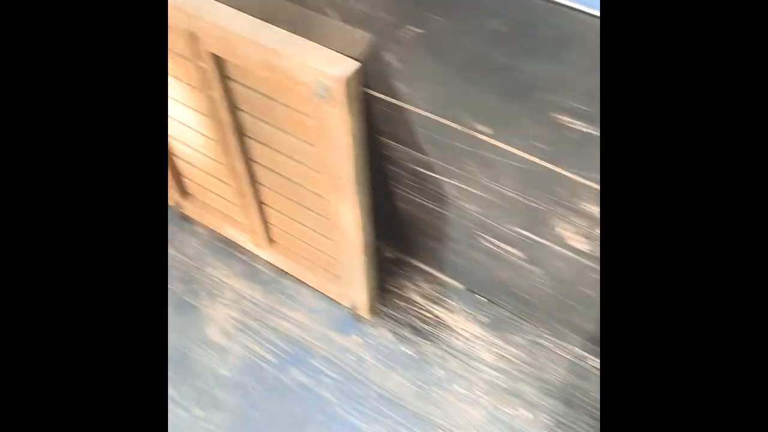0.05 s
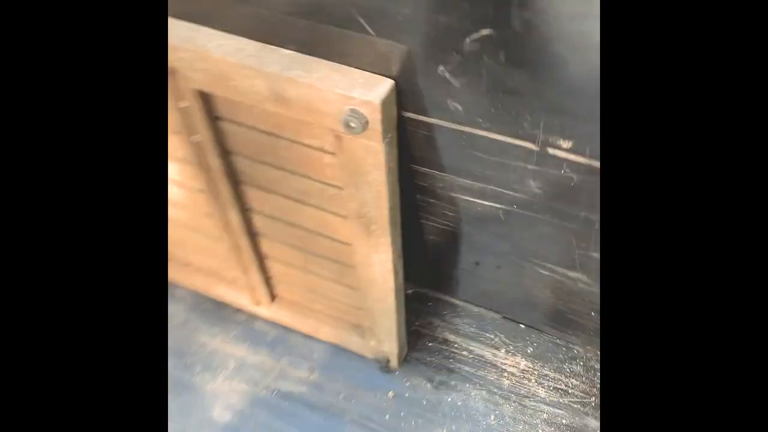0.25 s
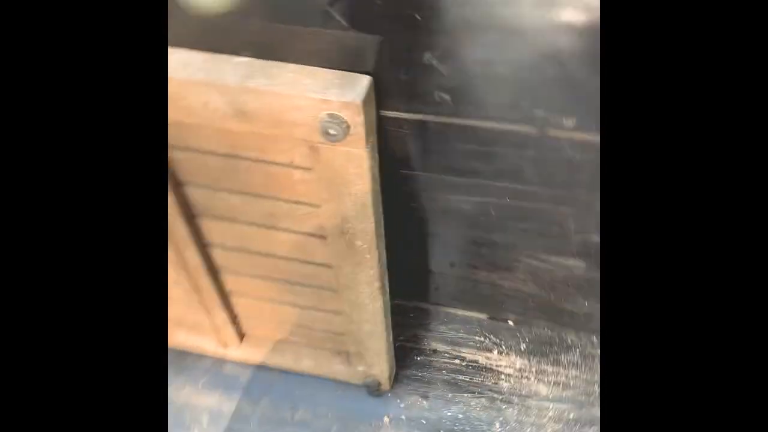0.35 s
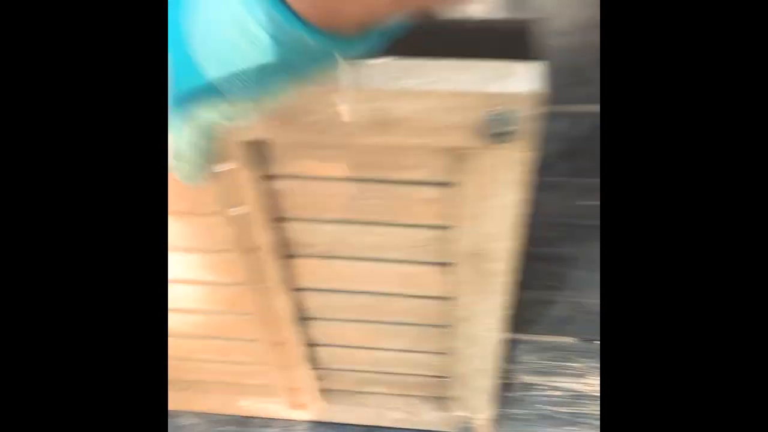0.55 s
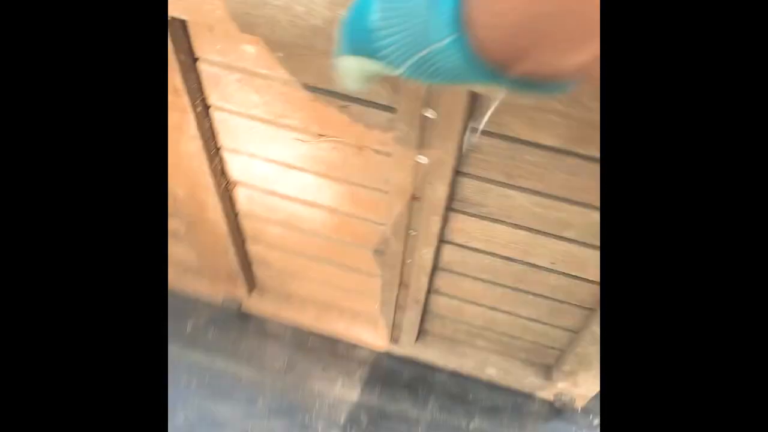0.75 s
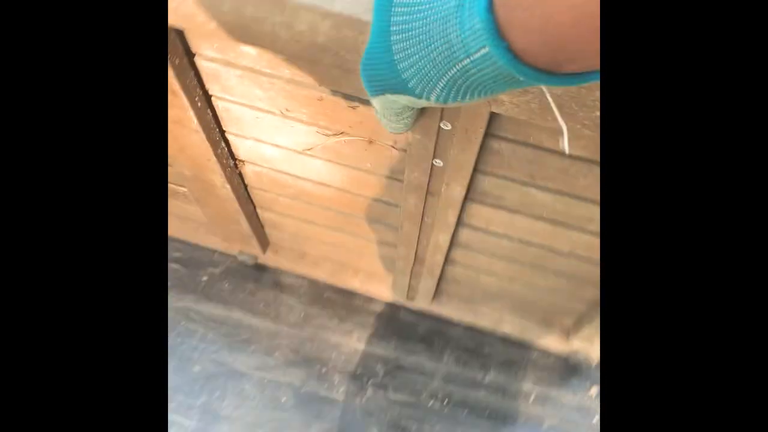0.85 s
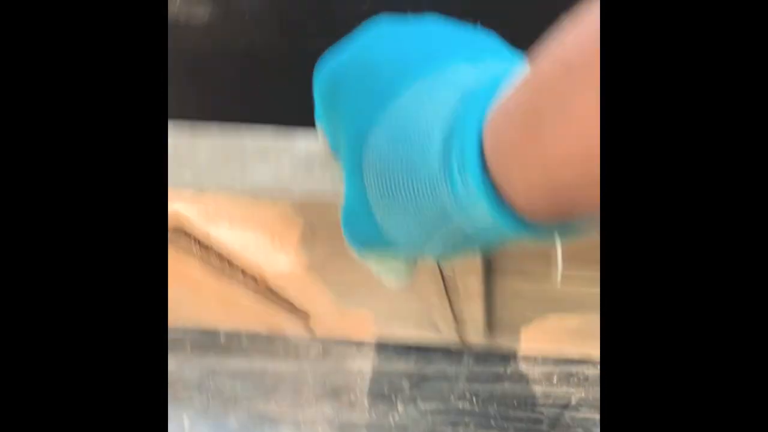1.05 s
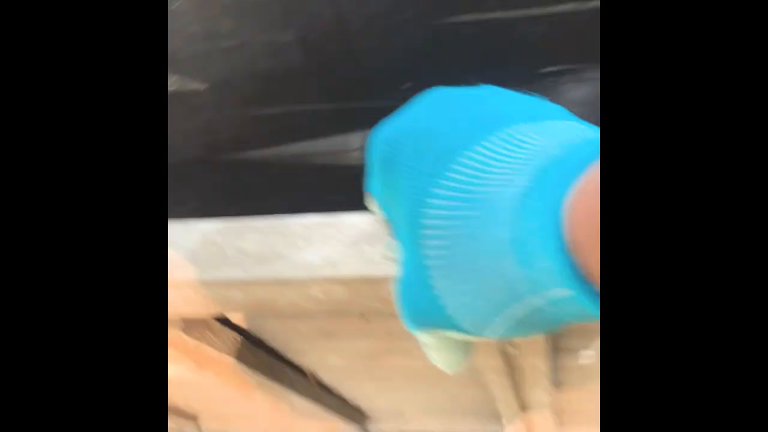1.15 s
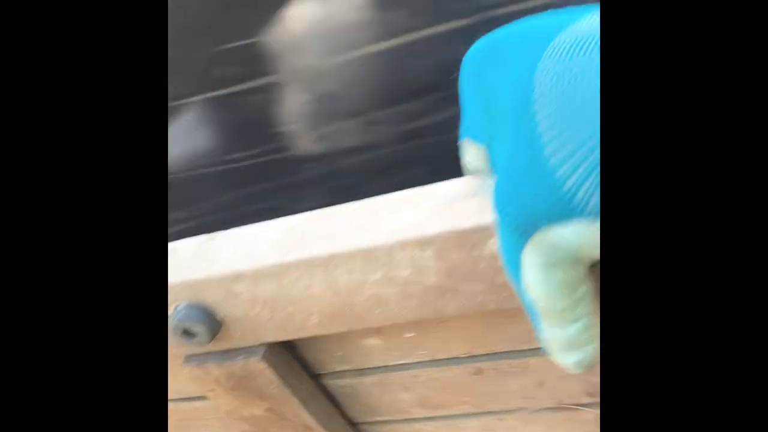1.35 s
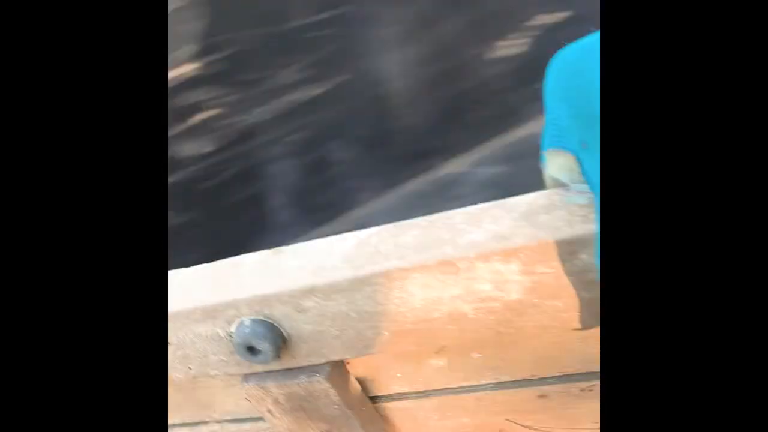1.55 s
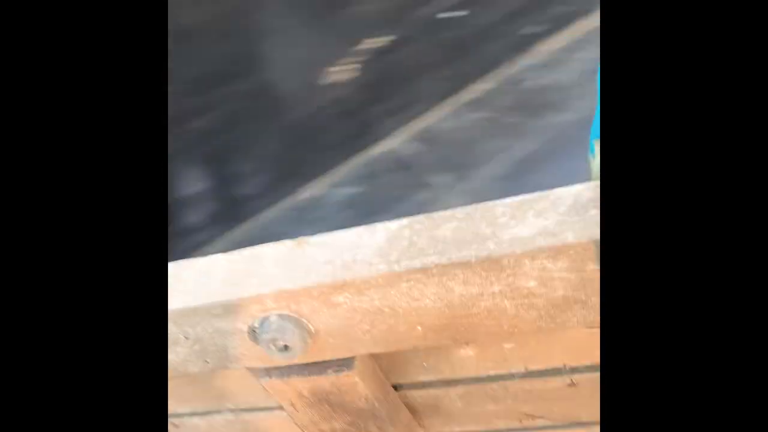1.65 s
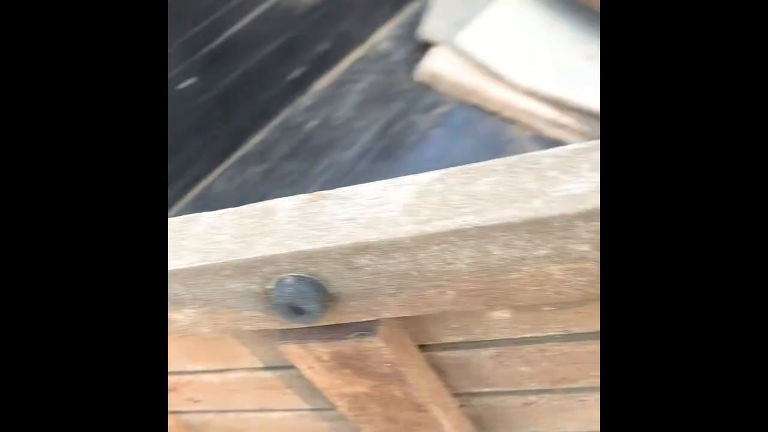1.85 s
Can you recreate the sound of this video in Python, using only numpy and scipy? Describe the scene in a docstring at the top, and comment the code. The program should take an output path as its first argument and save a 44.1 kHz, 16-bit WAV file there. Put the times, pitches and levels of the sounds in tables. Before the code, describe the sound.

A slatted wooden panel is dragged across a gritty board floor close to the microphone. It bumps and rasps, then clatters through a quick run of knocks and ends in a sharp scrape, over low outdoor rumble.

```python
"""Outdoors, on a gritty board floor close to the microphone, a gloved hand drags a slatted wooden panel.
Friction and impacts excite its modes and loose slats, so it judders, booms and knocks as it slides.
Grit hisses and rasps under the edge, which catches several times in stick-slip bursts, squeals briefly
and stops with a sharp scrape. Behind it lie a low rumble, a thin opening whistle and a faint whine."""
import sys
import numpy as np
from scipy import signal
from scipy.fft import rfft, irfft
from scipy.io import wavfile
from scipy.ndimage import map_coordinates

SR = 44100
rng = np.random.default_rng(int(sys.argv[2]) if len(sys.argv) > 2 else 0)


def dump(signal):
    """Clip the signal to [-1, 1] and save it as 16-bit WAV at the path in sys.argv[1]."""
    limited = np.clip(np.atleast_2d(signal).T, -1, 1)
    pcm = np.round(limited * 32767).astype(np.int16)
    wavfile.write(sys.argv[1], SR, pcm)


N = 83790
T = np.arange(N) / SR

# spectrum of the outdoor background (frequency [Hz], relative level [dB])
RUMBLE_SPECTRUM = [(20, -5), (55, -2), (85, 13), (125, -8.5), (300, -14.5), (600, -25.5), (2000, -36),
                   (16000, -76)]
# path of the thin whistle (time [s], frequency [Hz], level [dB])
WHISTLE_GLIDE = [(0, 7500, -77), (.07, 7200, -66), (.21, 8500, -70), (.33, 8900, -110)]

# modes of the panel and the boards under it (frequency [Hz], relative level [dB], T60 [s])
PANEL_MODES = [(66, 3, .22), (86, 1, .14), (108, -5, .16), (135, -7, .2), (164, -7, .24), (195, -10, .24),
               (235, -17, .2), (278, -13.5, .3), (345, -15.5, .28), (416, -22, .3), (575, -31, .4),
               (921, -30, .35), (1164, -32, .3)]
# dense ring of the loose slats (frequency [Hz], relative level [dB])
SLAT_SPECTRUM = [(30, -14), (70, 6), (170, 4), (330, -3.5), (450, -8.5), (560, -18), (950, -22),
                 (1500, -30.5), (8000, -66.5)]
# short woody bark at the start of a knock (frequency [Hz], relative level [dB])
BARK_SPECTRUM = [(300, 0), (850, 0.5), (4000, -38.5)]
# force with which the sliding edge shakes the panel (time [s], level [dB])
JUDDER_FORCE = [(0, -42.5), (.2, -41), (.24, -33.5), (.39, -28), (.46, -33.5), (.58, -28.5), (.88, -33),
                (.93, -20.5), (1.03, -24), (1.12, -24), (1.27, -26.5), (1.42, -34.5), (1.9, -54)]
# impacts of the panel on the floor (time [s], boom level [dB], clack level [dB])
FLOOR_IMPACTS = [(.224, 10.5, -3), (.241, 6, -8), (.291, 8.5, -11), (.397, 3, -11), (.566, 7.5, -6),
                 (.745, -1.5, -6), (.901, 7, 9), (.917, -1, 7), (.935, 13.5, 5), (.962, 7.5, 6),
                 (0.993, 7, 6.5), (1.007, 6, 8), (1.035, 8.5, 8.5), (1.086, 9, 3.5), (1.206, 1.5, 4),
                 (1.275, 2.5, -10.5), (1.51, 1.5, -22), (1.64, -2, -26), (1.685, -2.5, -20)]

# friction on the grit under the edge (time [s], hiss level [dB], rasp level [dB])
FRICTION_LEVELS = [(0, -78, -58), (.21, -67.5, -63), (.28, -50.5, -55.5), (.35, -52, -54), (.4, -64, -63),
                   (.45, -54.5, -51), (.52, -57.5, -59), (.67, -51.5, -56.5), (.76, -53.5, -49.5),
                   (.81, -57.5, -51.5), (.94, -56, -55.5), (1.02, -52, -45.5), (1.11, -54, -56),
                   (1.18, -48, -40.5), (1.27, -69, -58.5), (1.54, -74.5, -65.5), (1.63, -64.5, -56),
                   (1.85, -78, -67)]
# hiss of fine grit (frequency [Hz], relative level [dB])
HISS_SPECTRUM = [(1500, -12.5), (3000, 5.5), (4500, 6.5), (6500, 5.5), (9000, 0.5), (11500, -3.5),
                 (16000, -4.5)]
# rasp of coarse grit (frequency [Hz], relative level [dB])
RASP_SPECTRUM = [(250, -7.5), (550, 1), (1000, 7.5), (1800, 5.5), (2700, -5), (3800, 0), (6000, -27.5),
                 (14000, -31)]
FINE_GRAINS_PER_S, COARSE_GRAINS_PER_S = 9000, 900
# decay of reflections from the boards around (frequency [Hz], T60 [s])
REFLECTION_DECAY = [(1500, 0.14), (15000, 0.094)]

# the edge catches and slips (time [s], duration [s], crunch level [dB], sizzle level [dB])
EDGE_CATCHES = [(.556, 0.014, -48, -54.5), (0.752, 0.023, -42, -43.5), (0.83, 0.013, -44.5, -49),
                (.968, 0.0032, -45, -44), (1.002, 0.0066, -37.5, -45), (1.031, 0.0084, -32.5, -51),
                (1.055, 0.0094, -44, -52.5), (1.085, 0.0034, -29, -40.5), (1.138, 0.0059, -32.5, -47.5),
                (1.164, 0.0045, -37.5, -49), (1.192, 0.0093, -36.5, -38.5), (1.197, 0.0058, -34, -33.5)]
# low part of a catch (frequency [Hz], relative level [dB])
CRUNCH_SPECTRUM = [(300, 11.5), (700, 6), (1600, -0.5), (3500, -3.5), (5000, -5.5), (12000, -21)]
# high part of a catch (frequency [Hz], relative level [dB])
SIZZLE_SPECTRUM = [(2000, -8.5), (4500, 0.5), (7000, 4.5), (10000, 2.5), (12500, -4), (16000, -6)]
# squeaky resonances of the edge (frequency [Hz], width [Hz], lift [dB])
EDGE_RESONANCES = [(1450, 130, 5.5), (1871, 190, 12.5), (3100, 250, 8), (3927, 420, 11.5)]
# tones of the slipping edge (time [s], duration [s], frequency [Hz], level [dB])
EDGE_SQUEALS = [(1.084, 0.0081, 3174, -36.5), (1.169, 0.0081, 5940, -36.5), (1.19, 0.015, 1416, -32.5),
                (1.202, 0.0063, 6970, -42)]

# likeness of the two microphone ports (frequency [Hz], coherence [0-1])
PORT_COHERENCE = [(100, 1), (200, 0.98), (380, 0.75), (650, 0.17), (1800, 0.37), (4500, 0.96),
                  (15000, 0.98)]
# phase of the left port relative to the right (frequency [Hz], lead [rad])
PORT_PHASE = [(0, 0), (200, -.08), (400, -.5), (750, -2.4), (1600, -4.6), (3700, -4.4), (4600, -3.14),
              (16000, 13.9)]


def amp(db):
    """Amplitude ratio of a level in decibels."""
    return 10 ** (np.asarray(db) / 20)


def unit(x):
    """Normalisation to an rms of 1."""
    return x / np.sqrt(np.mean(x ** 2) + 1e-20)


def curve(table, column=1):
    """Linear interpolation of a time table at every sample."""
    table = np.array(table)
    return np.interp(T, table[:, 0], table[:, column])


def at_frequency(table, hz):
    """Interpolation on a log-frequency axis."""
    table_hz, value = np.transpose(table)
    return np.interp(np.log(hz + 1), np.log(table_hz + 1), value)


def add(mix, start_s, sound):
    """Superposition of a sound on the mix from a given time."""
    part = mix[..., round(start_s * SR):][..., :sound.shape[-1]]
    part += sound[..., :part.shape[-1]]


def ring(x, response):
    """Convolution of each channel with its impulse response."""
    return signal.fftconvolve(np.atleast_2d(x), np.atleast_2d(response), axes=1)[:, :N]


def colour(x, spectrum, peaks=(), size=4096):
    """Minimum-phase filtering, at unit energy, by a spectrum and its resonance peaks."""
    hz = abs(np.fft.fftfreq(size, 1 / SR))
    peak_db = sum(lift / (1 + (2 * (hz - centre) / width) ** 2) for centre, width, lift in peaks)
    log_gain = np.log(amp(at_frequency(spectrum, hz) + peak_db))
    taps = np.fft.ifft(np.exp(np.conj(signal.hilbert(log_gain)))).real[:size // 2]
    return ring(x, taps / np.linalg.norm(taps))


def fuzzy_tone(hz, width_hz):
    """Random modulation spreads a tone into a narrow band of noise."""
    knots = np.cumsum(width_hz * np.ones(N)) / SR
    carrier = np.exp(2j * np.pi * np.cumsum(hz * np.ones(N)) / SR)
    noise = rng.standard_normal((2, N)) + 1j * rng.standard_normal((2, N))
    return unit(np.array([(np.interp(knots, np.arange(N), side) * carrier).real for side in noise]))


def rumble(level_db=-40.5):
    """Stationary outdoor noise with most of its power in the bass."""
    gain = amp(at_frequency(RUMBLE_SPECTRUM, np.fft.rfftfreq(N, 1 / SR)))
    return amp(level_db) * unit(irfft(rfft(rng.standard_normal((2, N))) * gain, N))


def whistle():
    """Narrow-band noise, heard as a faint high tone, glides up and fades as the drag begins."""
    return amp(curve(WHISTLE_GLIDE, column=2)) * fuzzy_tone(curve(WHISTLE_GLIDE), width_hz=900)


def grit(grains_per_s, spread_db=4):
    """Shot noise: grains give tiny impulses of uneven size at random times."""
    size = amp(spread_db * np.minimum(rng.exponential(1, (2, N)), 4))
    return unit(size * rng.choice([-1, 1], (2, N)) * (rng.random((2, N)) < grains_per_s / SR))


def panel_response():
    """Modal superposition: the panel's impulse response is a sum of damped sinusoids."""
    modes = sum((-1) ** k * amp(db - 60 * T / t60) * np.sin(2 * np.pi * hz * T)
                for k, (hz, db, t60) in enumerate(PANEL_MODES))
    return modes / np.linalg.norm(modes)


def bend(x, spread_s=.0005, shifts_per_s=12):
    """Frequency modulation: shifting grip and load pull the resonances slightly up and down."""
    drift = rng.standard_normal(int(T[-1] * shifts_per_s) + 2)
    lag_s = spread_s * map_coordinates(drift, [T * shifts_per_s], order=3)
    return np.array([np.interp(T - lag_s, T, side) for side in x])


def judder(modes, slats_db=-5.5):
    """Forced vibration: the sliding edge shakes the panel's modes and its loose slats."""
    force = grit(FINE_GRAINS_PER_S) * amp(curve(JUDDER_FORCE))
    return bend(ring(force, modes)) + amp(slats_db) * colour(force, SLAT_SPECTRUM)


def slide():
    """Friction noise: the edge hisses over fine grit and rasps over coarse grit."""
    hiss = grit(FINE_GRAINS_PER_S) * amp(curve(FRICTION_LEVELS, column=1))
    rasp = grit(COARSE_GRAINS_PER_S) * amp(curve(FRICTION_LEVELS, column=2))
    return colour(hiss, HISS_SPECTRUM) + colour(rasp, RASP_SPECTRUM)


def wander(x, spread_db=2.8, patch_hz=280, patch_s=.04):
    """Time-varying filtering: the contact moves along the edge, so the timbre shifts in patches."""
    hz, t, spectra = signal.stft(x, SR, nperseg=512)
    field = rng.standard_normal((int(hz[-1] / patch_hz) + 2, int(t[-1] / patch_s) + 2))
    patches = map_coordinates(field, np.meshgrid(hz / patch_hz, t / patch_s, indexing="ij"), order=3)
    return signal.istft(spectra * unit(amp(spread_db * patches)), SR, nperseg=512)[1][:, :N]


def reflections(x, gain_db=-6.5):
    """Diffuse reflection from the boards leaves a short tail whose treble dies first."""
    hz, t, spectra = signal.stft(rng.standard_normal((2, SR // 2)), SR, nperseg=256)
    decay = amp(-60 * t / at_frequency(REFLECTION_DECAY, hz)[:, None])
    tail = signal.istft(spectra * decay, SR, nperseg=256)[1]
    return amp(gain_db) * ring(x, tail / np.linalg.norm(tail[0]))


def rattle(spectrum, t60_s, rise_s=.004):
    """Modal overlap: crowded resonances merge into decaying noise, here of unit energy."""
    envelope = np.minimum(T / rise_s, 1) * amp(-60 * T / t60_s)
    tail = colour(rng.standard_normal((2, N)) * envelope, spectrum)
    return tail / np.linalg.norm(tail, axis=1, keepdims=True)


def knocks(modes, contact_s=.0011, bark_db=-14):
    """Impact excitation: each bump on the floor sets the panel booming and the slats clacking."""
    slats = rattle(SLAT_SPECTRUM, t60_s=.28)
    bark = amp(bark_db) * rattle(BARK_SPECTRUM, t60_s=.06)
    push = T * np.exp(-2 * T / contact_s)
    boom, clack = np.zeros((2, N))
    for start_s, boom_db, clack_db in FLOOR_IMPACTS:
        add(boom, start_s, amp(boom_db) * push / push.sum())
        add(clack, start_s, amp([clack_db]))
    hard_clack = clack ** 2 / clack.max()  # only hard knocks bark
    return ring(boom, modes) + ring(clack, slats) + ring(hard_clack, bark)


def chatter(slips_per_s=400, decay_per_gap=.27):
    """Stick-slip motion releases grit in quick, uneven spurts that each die away."""
    slips = np.cumsum(rng.exponential(1, N) ** 3)
    slips *= slips_per_s * T[-1] / slips[-1]  # a slip starts at each whole number
    return unit(grit(FINE_GRAINS_PER_S) * np.exp(-(slips % 1) / decay_per_gap))


def catches(fall_s=.003):
    """Transient excitation: short bursts of slipping drive the resonances of the edge."""
    crunch, sizzle = np.zeros((2, 2, N))
    for start_s, duration_s, crunch_db, sizzle_db in EDGE_CATCHES:
        burst = np.exp(-np.maximum(T - duration_s, 0) / fall_s) * chatter()
        add(crunch, start_s, amp(crunch_db) * burst)
        add(sizzle, start_s, amp(sizzle_db) * burst)
    return colour(crunch, CRUNCH_SPECTRUM, EDGE_RESONANCES) + colour(sizzle, SIZZLE_SPECTRUM, EDGE_RESONANCES)


def whine(peak_db=-56, peak_s=.98, spread_s=.35):
    """Narrow-band noise, heard as a faint ringing, swells and fades around the hardest scraping."""
    swell = np.exp(-((T - peak_s) / spread_s) ** 2)
    return amp(peak_db) * swell * fuzzy_tone(hz=2430, width_hz=170)


def squeals():
    """Resonance: in the hardest catches one mode of the edge builds up and rings for a moment."""
    tones = np.zeros((2, N))
    offset_cycles = np.array([[0], [1 / 4]])  # left, right
    for start_s, duration_s, hz, db in EDGE_SQUEALS:
        swell = np.sin(np.pi * np.minimum(T / duration_s, 1))
        add(tones, start_s, amp(db) * swell * np.sin(2 * np.pi * (hz * T + offset_cycles)))
    return tones


def ports(x):
    """Partial coherence: two microphone ports differ in phase and are least alike in the midrange."""
    hz = np.fft.rfftfreq(2 * N, 1 / SR)
    left, other = rfft(x, 2 * N)
    coherence = np.clip(at_frequency(PORT_COHERENCE, hz), 0, 1)
    lead = np.interp(hz, *np.transpose(PORT_PHASE))
    right = (coherence * left + np.sqrt(1 - coherence ** 2) * other) * np.exp(-1j * lead)
    return irfft(np.array([left, right]))[:, :N]


def scene():
    """Superposition of the background and the dragged panel at the microphone."""
    background = rumble() + whistle() + whine()
    modes = panel_response()
    panel = judder(modes) + knocks(modes)
    scrape = wander(slide() + catches()) + squeals()
    return ports(background + panel + scrape + reflections(scrape))


def record(dry, low_cut_hz=38, high_cut_hz=15780):
    """Band limiting: the recorder removes the deepest bass and the highest treble."""
    high_pass = signal.butter(5, low_cut_hz, "high", fs=SR, output="sos")
    low_pass = signal.firwin(511, high_cut_hz, window=("kaiser", 9), fs=SR)
    return signal.oaconvolve(signal.sosfilt(high_pass, dry), low_pass[None], "same")


dry = scene()
out = record(dry)
dump(out)
```